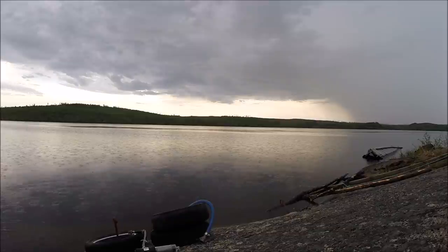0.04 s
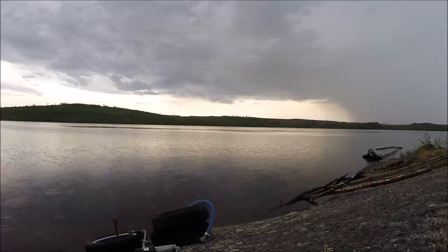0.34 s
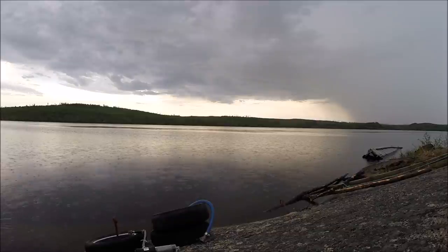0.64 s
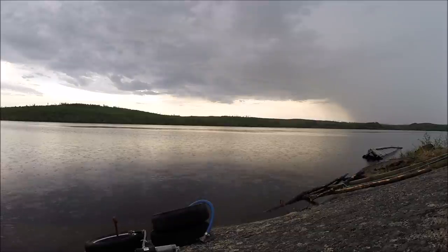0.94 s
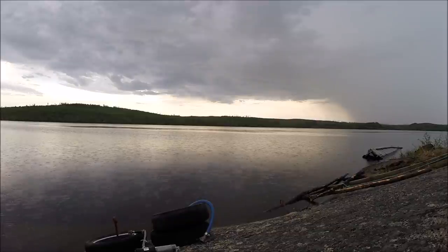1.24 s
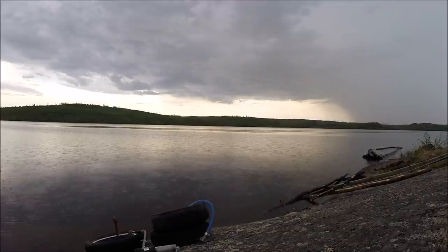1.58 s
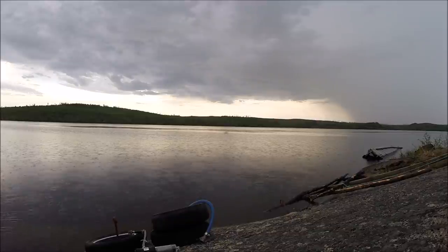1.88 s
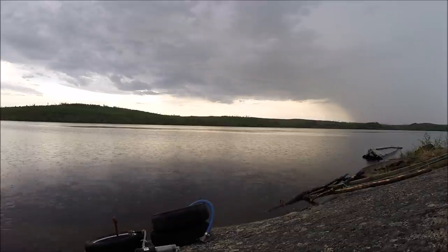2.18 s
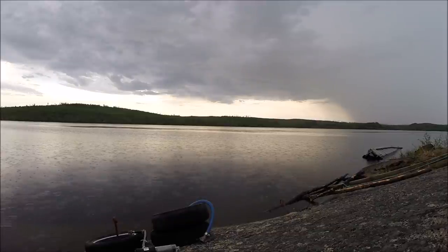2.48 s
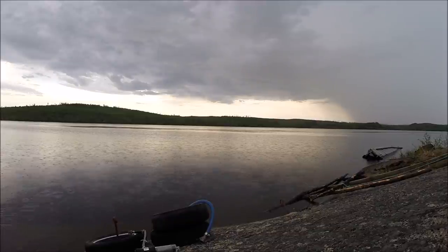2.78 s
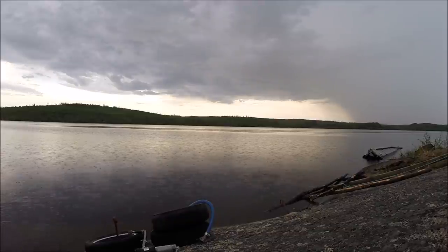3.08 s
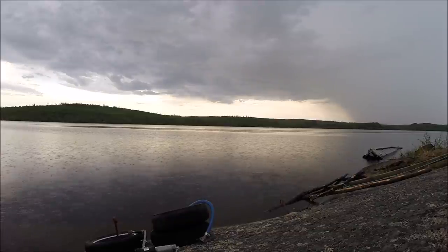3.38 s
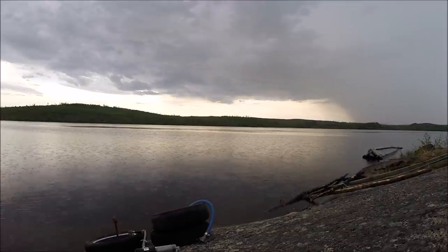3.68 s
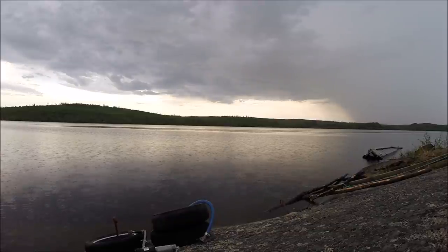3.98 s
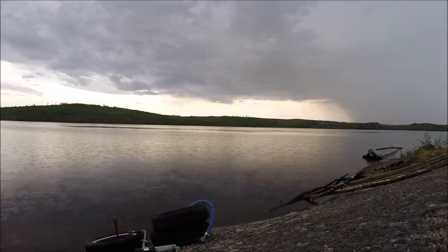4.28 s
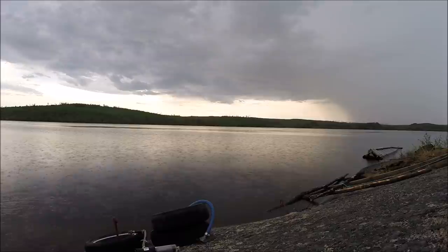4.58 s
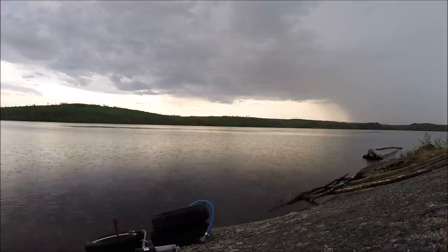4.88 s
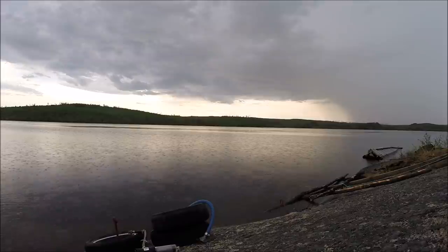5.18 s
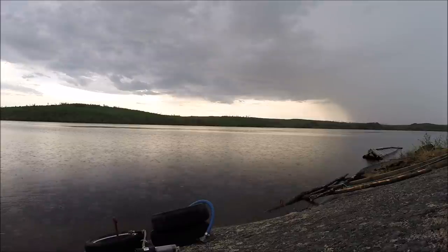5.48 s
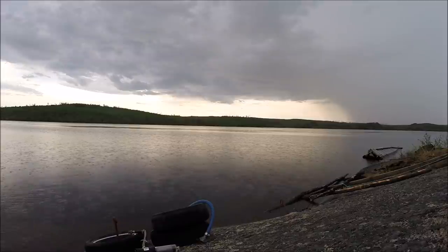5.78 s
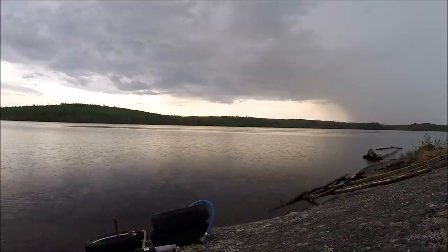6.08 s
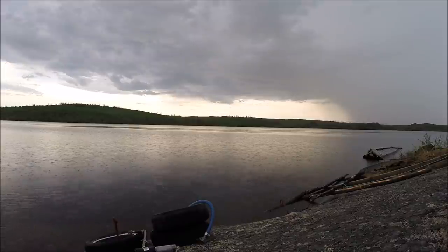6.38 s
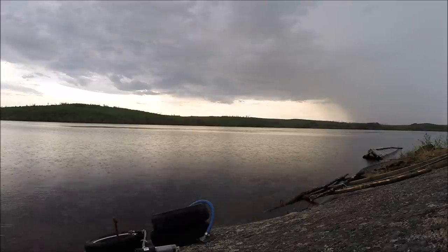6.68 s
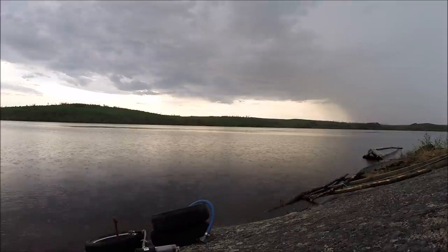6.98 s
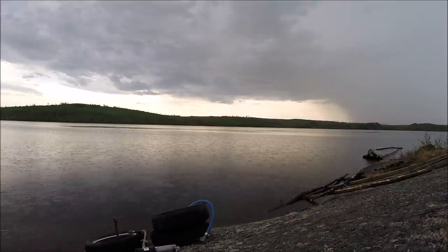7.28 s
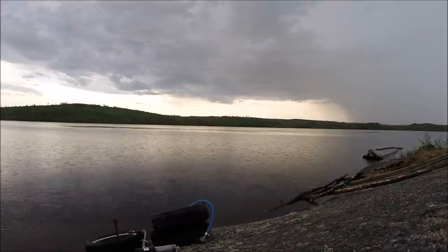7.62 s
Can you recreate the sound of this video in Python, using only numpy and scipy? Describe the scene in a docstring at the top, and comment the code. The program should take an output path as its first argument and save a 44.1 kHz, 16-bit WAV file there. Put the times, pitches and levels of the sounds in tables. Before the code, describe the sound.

Thunder starts as a low rumble over an open lake shore, swells into loud tearing peals and claps, then rolls on, duller and slowly weakening. Light rain hisses softly underneath, with small drops ticking and plinking on water and rock close by. A very faint, distant bird whistle is nearly buried as the thunder builds. Near the end, one drop strikes the microphone's housing with a sharp click.

```python
"""A bare rock lake shore in light rain, under thunder.
Shock fronts from the lightning channel make one long roll with peals and claps on top;
the rock mirrors each front. Drops tick on water and stone, some leaving a ringing bubble.
A far bird whistles once; one drop clicks on the microphone's housing."""
import sys
import numpy as np
from scipy import signal
from scipy.fft import rfft, irfft
from scipy.io import wavfile
from scipy.ndimage import uniform_filter1d

SR = 44100
rng = np.random.default_rng(int(sys.argv[2]) if len(sys.argv) > 2 else 0)


def int16_out(signal):
    """Quantize to a 16-bit WAV file."""
    q = np.round(np.clip(np.atleast_2d(signal).T, -1, 1) * 32767)
    wavfile.write(sys.argv[1], SR, q.astype(np.int16))


N = 337365
TIME = np.arange(N) / SR

# bird's notes: t/s, length/s, f/Hz, level/dB
BIRD_NOTES = [(1.835, .06, 3640, -63.5), (1.87, .14, 3510, -66.5), (1.975, .12, 3290, -67)]
# rain wash on the lake: f/Hz, density/dB
RAIN_SPECTRUM = [(60, 4), (300, 6.5), (900, 0), (1600, -1), (2800, -3), (4000, -7.5), (5500, -12),
                 (8000, -18), (11000, -24), (15000, -31)]
# close drops: t/s, level/dB, f/Hz, t60/s
NEAR_DROPS = [(.127, -50, 2800, .025), (.6405, -53, 5250, .008), (1.3632, -53, 3570, .02),
              (2.668, -47, 7000, .002), (2.7417, -42.5, 5700, 0.0072), (3.0477, -44, 6500, .0014),
              (3.7154, -50, 7450, .0015), (4.036, -48, 3380, .015), (4.0907, -35, 7000, 0.0008),
              (4.293, -33, 10400, 0.00091), (4.4746, -54, 6500, .008), (4.921, -49.5, 3400, .02),
              (5.803, -49, 2650, 0.033), (5.1925, -50, 4000, .006), (6.027, -47, 5500, .0043),
              (6.175, -48, 2850, .02), (7.207, -46, 3700, .01), (7.237, -48, 4200, .006),
              (7.4495, -51, 6000, .008)]
# housing modes: f/Hz, level/dB, t60/s
HOUSING_MODES = [(1950, .4, .005), (3240, -15.5, .0027), (5590, -17.5, .006), (7200, -6, .001)]
# fronts from the channel's overhead, near and far parts: f/Hz, density/dB
OVERHEAD_SPECTRUM = [(20, -4), (45, 8), (80, 7), (130, 6), (190, 0.5), (270, -4), (370, -3), (520, 3.5),
                     (700, 1), (900, -4.5), (1150, -4.5), (1550, -9), (2000, -17.5), (2600, -30.5),
                     (4000, -53)]
NEAR_SPECTRUM = [(20, -4), (45, 5.5), (90, 4.5), (140, 2.5), (190, 5.5), (270, -7.5), (390, -0.5),
                 (510, 4.5), (700, 2), (900, -6), (1100, -8), (1550, -15.5), (2000, -25.5), (2600, -42.5),
                 (4000, -68.5)]
FAR_SPECTRUM = [(20, -2), (60, 1), (103, 6), (145, 8), (183, 5), (225, 7), (300, 2), (400, 3.5), (560, -4),
                (760, -6.5), (920, -9), (1350, -15), (1600, -21.5), (2100, -38), (3200, -60)]
# rock reflections by direction of arrival: delay/s, pressure ratio
ROCK_OVERHEAD = [(.0045, 0.18)]
ROCK_NEAR = [(.00168, 0.31), (.0043, 0.06)]
ROCK_FAR = [(.00158, 0.44), (.00805, 0.14)]
# later fronts come from farther off: t/s, far share/0-1
FAR_SHARE = [(0, 0), (2.6, 0.05), (3.3, 0.45), (4.5, 0.99), (7.65, 0.71)]
# long roll: t/s, boom/dB, tearing/dB
ROLL_LEVELS = [(0, -59, -74), (.27, -54.5, -61.5), (.68, -42, -54), (1.3, -34.5, -45), (1.62, -30, -39.5),
               (1.9, -27.5, -32), (2.601, -23.5, -27.5), (2.95, -29.5, -32), (3.95, -30.5, -34),
               (4.8, -29.5, -33.5), (5.25, -32.5, -37), (6.48, -36, -42.5), (6.95, -36, -43.5),
               (7.65, -36, -39)]
# peals, each from one stretch of the channel: t/s, rise/s, length/s, boom/dB, tearing/dB
CHANNEL_PEALS = [(0.288, .012, 0.016, -62, -50), (0.366, 0.048, 0.06, -41, -46),
                 (.62, 0.048, 0.087, -39, -49.5), (0.832, 0.035, 0.047, -41, -47),
                 (0.905, 0.042, 0.051, -42, -40.5), (.97, 0.022, 0.049, -33, -51),
                 (1.105, 0.042, 0.054, -33.5, -42), (1.387, 0.031, 0.17, -37, -39.5),
                 (1.66, 0.012, 0.047, -31, -31.5), (1.742, 0.025, 0.041, -37, -28.5),
                 (2.172, 0.017, 0.17, -23.5, -23), (2.338, .06, 0.11, -25, -25),
                 (2.696, 0.13, .15, -26, -26), (3.008, 0.073, 0.14, -26.5, -24.5),
                 (3.173, 0.018, 0.06, -27, -28.5), (3.275, 0.032, 0.06, -25.5, -26),
                 (3.404, 0.11, 0.15, -21, -19), (3.5, 0.027, 0.063, -22, -29.5),
                 (3.572, 0.016, 0.077, -25, -24.5), (3.656, 0.045, 0.19, -23.5, -24),
                 (3.99, .02, 0.053, -44, -32), (4.095, 0.015, 0.12, -40, -31.5),
                 (4.512, 0.036, 0.12, -30.5, -48), (4.954, 0.012, 0.04, -30, -33.5),
                 (5.32, 0.07, 0.077, -47, -35), (5.61, 0.024, 0.1, -40, -36.5),
                 (6.027, 0.04, 0.14, -49, -38.5), (6.278, 0.017, 0.039, -30.5, -34),
                 (6.568, 0.023, 0.088, -36, -35.5), (7.198, 0.022, 0.074, -32, -39),
                 (7.563, 0.018, 0.023, -31.5, -36)]
# brief swells of crackle in the dying roll: centre t/s, length/s, level/dB
CRACKLE_SWELLS = [(4.394, 0.023, -38), (4.686, 0.037, -32.5), (4.901, 0.027, -38), (5.019, 0.016, -35),
                  (5.405, 0.046, -42)]
# strong single fronts: t/s, level/dB, swing f/Hz
CLAP_FRONTS = [(.13, -41.5, 107), (0.312, -37, 1100), (.4382, -26, 900), (.4432, -32, 1000),
               (0.477, -39, 1200), (.695, -33, 680), (0.7395, -31, 107), (.951, -24.5, 780),
               (.977, -26, 110), (1.029, -32, 950), (1.151, -30, 680), (1.425, -22.5, 686),
               (1.517, -21, 650), (1.531, -24, 900), (1.688, -23, 1190), (1.753, -20, 900),
               (1.776, -20, 1150), (1.7829, -17, 1050), (1.836, -19.5, 704), (1.911, -19.5, 750),
               (1.955, -20, 600), (2.026, -16.5, 540), (2.1835, -18.5, 600), (2.268, -15, 560),
               (2.302, -13, 161), (2.311, -12.5, 130), (2.4225, -11, 660), (2.445, -12, 600),
               (2.4858, -7.5, 590), (2.4899, -6, 544), (2.5607, -10.5, 590), (2.659, -16, 540),
               (2.812, -16, 600), (2.8283, -15, 700), (2.9962, -16, 540), (3.088, -14.5, 520),
               (3.155, -14.5, 520), (3.192, -15, 520), (3.2311, -14.5, 550), (3.2384, -16, 150),
               (3.297, -14.5, 627), (3.3367, -12.5, 347), (3.491, -12, 600), (3.5367, -10.5, 110),
               (3.548, -6.5, 109), (3.552, -8, 600), (3.728, -16, 576), (3.74, -12.5, 145),
               (3.778, -16, 600), (4.018, -17, 635), (4.122, -15.5, 705), (4.1287, -17, 910),
               (4.29, -19.5, 850), (4.622, -21, 140), (4.6253, -20, 592), (4.972, -10.5, 580),
               (4.979, -15.5, 150), (4.9803, -15, 614), (5.042, -21, 520), (5.087, -17.5, 161),
               (5.4834, -20, 165), (5.492, -21.5, 150), (5.6965, -23.5, 430), (5.7027, -17.5, 138),
               (5.883, -24, 497), (6.2884, -20.5, 480), (6.2986, -24, 139), (6.5952, -22, 600),
               (6.63, -23, 520), (6.6573, -24, 527), (7.5856, -20.5, 452), (7.588, -15.5, 134)]


def amp(db):
    """dB to gain."""
    return 10 ** (np.asarray(db) / 20)


def unit(x):
    """Scale to rms 1."""
    return x / np.sqrt(np.mean(x ** 2) + 1e-20)


def add(mix, t_s, sound):
    """Mix in at t_s."""
    part = mix[max(round(t_s * SR), 0):][:len(sound)]
    part += sound[:len(part)]


def decay(t60_s, size):
    """Exponential fall, 60 dB per t60_s."""
    return np.exp(-np.log(1000) * TIME[:size] / t60_s)


def ring(hz, t60_s, size=4096):
    """One damped mode."""
    return np.sin(2 * np.pi * hz * TIME[:size]) * decay(t60_s, size)


def colour(x, spectrum, size=16384):
    """Minimum-phase filter; -6 dB/octave above the last point."""
    hz, db = np.transpose(spectrum)
    grid_hz = abs(np.fft.fftfreq(size, 1 / SR)) + 1
    curve_db = np.interp(np.log(grid_hz), np.log(hz), db)
    curve_db -= 20 * np.log10(np.maximum(grid_hz / hz[-1], 1))
    log_response = np.conj(signal.hilbert(np.log(amp(curve_db))))
    impulse = np.fft.ifft(np.exp(log_response)).real
    return irfft(rfft(x) * rfft(impulse[:size // 2], N), N)


def arrivals(per_s, spread_db):
    """Random impulses, most small, a few large."""
    heights = rng.choice([-1, 1], N) * amp(spread_db * np.minimum(rng.exponential(1, N), 4))
    return heights * (rng.random(N) < per_s / SR)


def steadied(x, span_s):
    """Hold the slow level at 1, keep the grain."""
    width = int(span_s * SR)
    power = uniform_filter1d(uniform_filter1d(x ** 2, width), width)
    return x / np.sqrt(abs(power) + 1e-20)


def bird(fall_hz_per_s=400, blur_hz=110, blur_depth=0.9):
    """Thin whistle in three falling notes, blurred by the water, echoed by the wooded shore."""
    out = np.zeros(N)
    lowpass = signal.butter(2, blur_hz, fs=SR, output="sos")
    for t_s, length_s, hz, db in BIRD_NOTES:
        t = np.arange(0, length_s, 1 / SR)
        pitch_hz = hz - fall_hz_per_s * (t - length_s / 2)
        carrier = np.exp(2j * np.pi * np.cumsum(pitch_hz) / SR)
        scatter = signal.sosfilt(lowpass, rng.standard_normal((2, SR)))[:, -len(t):]
        blur = 1 + blur_depth * (unit(scatter[0]) + 1j * unit(scatter[1]))
        swell = np.sqrt(abs(np.sin(np.pi * t / length_s)))
        add(out, t_s, amp(db) * unit((carrier * blur).real) * swell)
    forest = rng.standard_normal(SR) * decay(t60_s=.9, size=SR)
    return out + amp(-3) * signal.oaconvolve(out, forest / np.linalg.norm(forest))[:N]


def rain():
    """Far drops merge to a wash; nearer ones tick or leave a ringing bubble."""
    wash = unit(colour(arrivals(per_s=9000, spread_db=2.5), RAIN_SPECTRUM))
    ticks = sum(signal.oaconvolve(arrivals(per_s=6, spread_db=2.4), ring(hz, t60_s=.0011))[:N]
                for hz in np.geomspace(3500, 11000, num=10))
    bubbles = sum(signal.oaconvolve(arrivals(per_s=2.5, spread_db=2.5), ring(hz, t60_s=.015))[:N] / hz
                  for hz in np.geomspace(2200, 4200, num=20))
    return amp(-57.5) * wash + amp(-78.5) * unit(ticks) + amp(-73.5) * unit(bubbles)


def near_drops(size=4096):
    """Each close drop ticks on landing, splashes and rings."""
    out = np.zeros(N)
    for t_s, db, hz, t60_s in NEAR_DROPS:
        tick, bubble = ring(hz, t60_s=.00076), ring(hz, t60_s)
        spray = signal.oaconvolve(rng.standard_normal(2 * size), ring(hz, t60_s=.003), "valid")[:size]
        splash = unit(spray) * decay(t60_s, size)
        add(out, t_s, amp(db) * (bubble + amp(-2.5) * tick + amp(-7) * splash))
    return out


def housing_hit(t_s=7.3971):
    """Drop on the plastic shell: a click of fast-dying modes, crest clipped."""
    out = np.zeros(N)
    add(out, t_s, sum(amp(db) * ring(hz, t60_s) for hz, db, t60_s in HOUSING_MODES))
    return np.clip(out, -.92, .92)


def off_rock(x, bounces):
    """Direct sound plus rock reflections: a comb filter."""
    return x + sum(ratio * np.interp(TIME - delay_s, TIME, x, left=0) for delay_s, ratio in bounces)


def interference(x, depth_db, size=2048):
    """Fronts from the channel's zigzags interfere, lifting one pitch, then another."""
    frames = dict(nperseg=size, noverlap=size * 3 // 4)
    spectra = signal.stft(x, **frames)[2]
    patches = uniform_filter1d(rng.standard_normal(spectra.shape), size=5, axis=0)
    patches = uniform_filter1d(patches, size=6, axis=1)
    return signal.istft(spectra * amp(depth_db * unit(patches)), **frames)[1][:N]


def three_bands(x, low_hz=285, high_hz=950):
    """Split into boom, tearing, crackle."""
    hz, spectrum = np.fft.rfftfreq(N, 1 / SR), rfft(x)
    low = irfft(spectrum / (1 + (hz / low_hz) ** 7), N)
    low_mid = irfft(spectrum / (1 + (hz / high_hz) ** 10), N)
    return low, low_mid - low, x - low_mid


def peal_gains(release_s=.032):
    """Boom and tearing gains: each peal swells, holds, dies; powers add."""
    power = np.zeros((2, N))
    for t_s, rise_s, length_s, *bands_db in CHANNEL_PEALS:
        t = TIME - t_s
        envelope = np.clip(t / rise_s, 0, 1) * np.exp(-np.maximum(t - length_s, 0) / release_s)
        power += (amp(bands_db)[:, None] * envelope) ** 2
    return np.sqrt(power)


def band_gains(dulling_db_per_s=1.0):
    """Peals pile on the roll; crackle follows the tearing, fades with air path, swells briefly."""
    t_s, *bands_db = np.transpose(ROLL_LEVELS)
    boom, tearing = (amp(np.interp(TIME, t_s, db)) for db in bands_db)
    peal_boom, peal_tearing = peal_gains()
    crackle = np.hypot(tearing, amp(-2.5) * peal_tearing) * amp(-6 - dulling_db_per_s * TIME)
    swells = sum(amp(db) * np.exp(-(2 * (TIME - centre_s) / length_s) ** 2)
                 for centre_s, length_s, db in CRACKLE_SWELLS)
    return np.hypot(boom, peal_boom), np.hypot(tearing, peal_tearing), np.hypot(crackle, swells)


def claps(trail_t60_s=.06, trail_db=-9, size=4096):
    """Strong single fronts: a short pressure swing, rounded by air, trailed by weaker ones."""
    out, hz = np.zeros(N), np.fft.rfftfreq(size, 1 / SR)
    for t_s, db, swing_hz in CLAP_FRONTS:
        swing = (hz / swing_hz * np.exp(-hz / swing_hz)) ** 3.66
        air = 1 / (1 + (hz / (300 + swing_hz)) ** 4)
        front = irfft(1j * swing * air)
        trail = irfft(swing * air * rfft(rng.standard_normal(size) * decay(trail_t60_s, size)))
        wave = np.roll(front + amp(trail_db) * front.std() * unit(trail), size // 2)
        add(out, t_s - size / 2 / SR, amp(db) * wave / abs(front).max())
    return off_rock(out, ROCK_FAR)


def roll(overhead_until_s=1.73, overhead_fade_s=.43):
    """Bunched shock fronts from all along the channel: bright overhead first, then dulled by air."""
    bunches = amp(1.1 * unit(uniform_filter1d(rng.standard_normal(N), size=900)))
    fronts = bunches * (unit(arrivals(per_s=1100, spread_db=1.56)) + .49 * rng.standard_normal(N))
    fronts = interference(fronts, depth_db=2.0)
    overhead = off_rock(colour(fronts, OVERHEAD_SPECTRUM), ROCK_OVERHEAD)
    near = off_rock(colour(fronts, NEAR_SPECTRUM), ROCK_NEAR)
    far = off_rock(colour(fronts, FAR_SPECTRUM), ROCK_FAR)
    far_share = np.interp(TIME, *np.transpose(FAR_SHARE))
    overhead_share = np.clip(1 - (TIME - overhead_until_s) / overhead_fade_s, 0, 1)
    later = (1 - far_share) * near + far_share * far
    bands = three_bands(overhead_share * overhead + (1 - overhead_share) * later)
    return sum(steadied(band, span_s=.074) * gain for band, gain in zip(bands, band_gains()))


def scene():
    """Thunder over the rainy shore, mono."""
    return (roll() + claps() + rain() + near_drops() + housing_hit() + bird())[None]


def record(dry, low_hz=17, high_hz=15150):
    """Bass cut and band limit."""
    thinned = signal.sosfilt(signal.butter(2, low_hz, "highpass", fs=SR, output="sos"), dry)
    lowpass = signal.firwin(511, high_hz, window=("kaiser", 9), fs=SR)
    return signal.oaconvolve(thinned, lowpass[None], "same")


dry = scene()
out = record(dry)
int16_out(out)
```